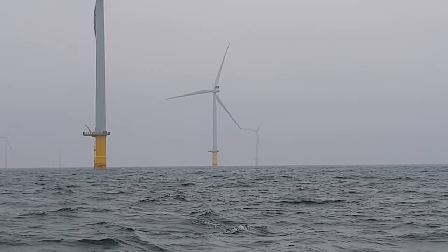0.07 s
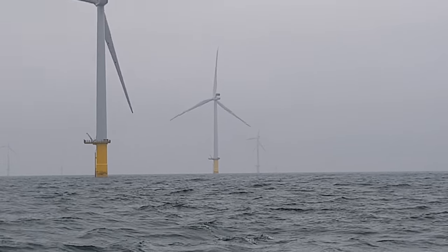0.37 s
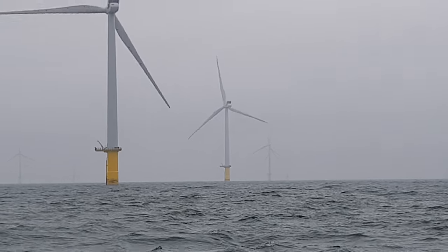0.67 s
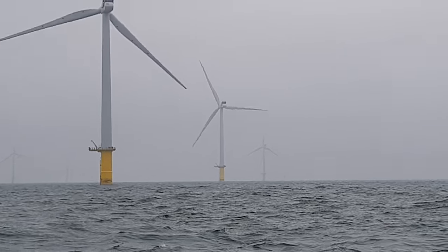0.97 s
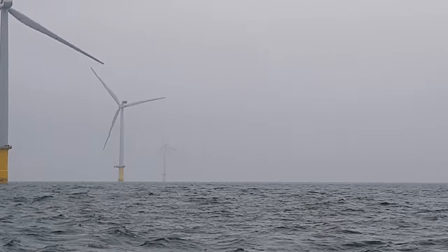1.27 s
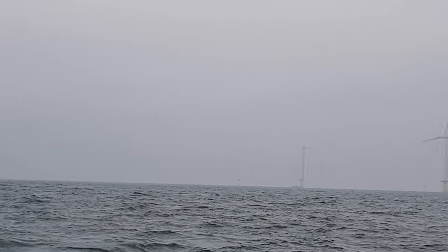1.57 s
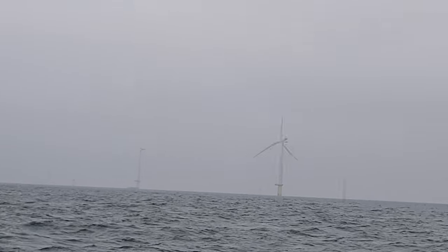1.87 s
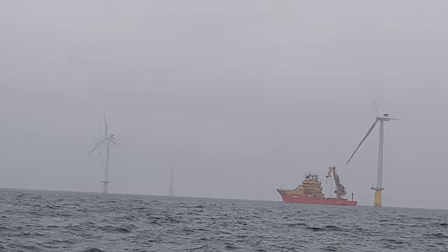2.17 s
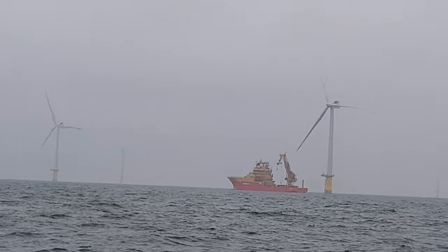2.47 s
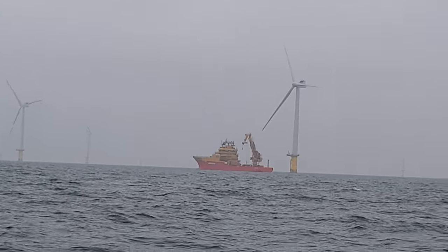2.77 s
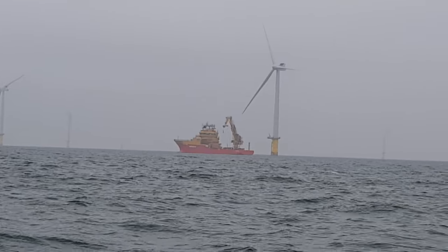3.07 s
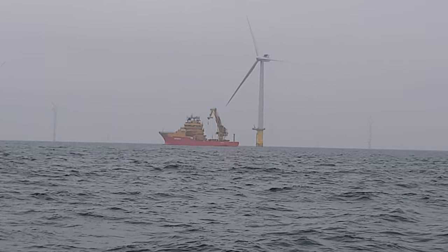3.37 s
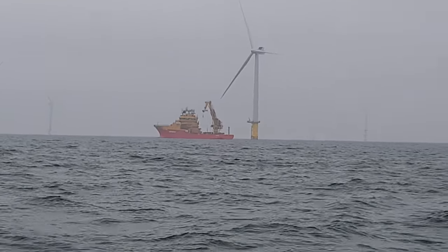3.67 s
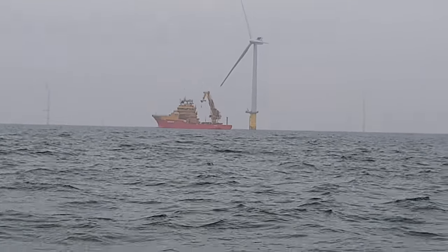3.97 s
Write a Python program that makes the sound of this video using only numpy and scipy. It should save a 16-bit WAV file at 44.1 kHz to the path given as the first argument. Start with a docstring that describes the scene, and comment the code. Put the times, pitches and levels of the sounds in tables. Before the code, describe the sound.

A diesel boat engine rumbles and throbs steadily, with a hard knock coming forward halfway through. Heard from on board at sea, choppy waves bubble along the hull under hissing wind and spray, and a few drops tick nearby.

```python
"""On board a boat in a choppy sea, a three-cylinder diesel runs steadily.
Its exhaust booms and burbles, each firing drums the hull, and loose panels hum in step.
A hard knock from the uneven cylinders comes forward halfway through.
Waves wash along the side as ringing bubbles and fizzing froth, under a hiss of wind and spray,
and a few drops tick close by."""
import sys
import numpy as np
from scipy import signal
from scipy.fft import rfft, irfft
from scipy.io import wavfile
from scipy.ndimage import uniform_filter1d, minimum_filter1d

SR = 44100
rng = np.random.default_rng(int(sys.argv[2]) if len(sys.argv) > 2 else 0)


def bounce(signal):
    """Save signal as a 16-bit WAV file at the path given by the first command-line argument."""
    frames = np.transpose(np.atleast_2d(signal))
    limited = np.clip(frames, -1, 1)
    pcm = np.round(limited * 32767).astype(np.int16)
    wavfile.write(sys.argv[1], SR, pcm)


N = 176400

# relative strength of each cylinder, in firing order: hull drum/dB, knock/dB
CYLINDERS = [(0, 0), (-1.5, -12), (-2.5, -3.5)]
# fader ride shared by the burble, the hull drum and the panels: t/s, level/dB
ENGINE_RIDE = [(0.0, -15), (1.05, -16), (1.12, -24.5), (1.24, -12.5), (1.51, -15), (1.69, -18.5),
               (1.84, -15), (2.12, -19.5), (2.72, -17.5), (2.77, -21), (2.82, -17), (3.21, -18.5),
               (3.27, -20), (3.32, -22.5), (3.49, -15.5), (3.91, -21), (3.94, -18.5), (4.0, -20)]


def undb(db):
    """Decibels to gain."""
    return 10 ** (np.asarray(db) / 20)


def unit(x):
    """Scale to rms 1."""
    return x / np.sqrt(np.mean(x ** 2) + 1e-18)


def curve(rows):
    """Straight lines through (t/s, value) rows."""
    return np.interp(np.arange(N) / SR, *np.array(rows).T)


def pan(db):
    """Stereo gains that put the left db above the right."""
    return undb(np.array([[db], [-db]]) / 2)


def walk(rate_hz):
    """Smooth random drift at rms 1."""
    hold = int(SR / rate_hz)
    steps = np.repeat(rng.standard_normal(N // hold + 2), hold)
    return unit(uniform_filter1d(uniform_filter1d(steps, hold), hold)[:N])


def colour(x, points):
    """EQ through (f/Hz, level/dB) points, rolled off beyond both ends, at rms 1."""
    hz, db = np.array(points).T
    f = np.arange(N // 2 + 1) * SR / N + 1
    skirt = 1 / (1 + (f / (2 * hz[-1])) ** 4) / (1 + (hz[0] / 2 / f) ** 4)
    return unit(irfft(rfft(x) * skirt * undb(np.interp(np.log(f), np.log(hz), db)), N))


def band(x, hz, half_width_hz):
    """A broad resonance with steep sides, at rms 1."""
    f = np.arange(N // 2 + 1) * SR / N + 1
    return unit(irfft(rfft(x) / (1 + 1j * (f * f - hz * hz) / (2 * f * half_width_hz)) ** 2, N))


def ring(x, modes, attack_s=1e-4):
    """Drive modes (f/Hz, t60/s, level/dB) that build up and decay."""
    t = np.arange(SR // 4) / SR
    response = sum(undb(db - 60 * t / t60) * np.sin(2 * np.pi * hz * t) for hz, t60, db in modes)
    return signal.fftconvolve(x, response * (1 - np.exp(-t / attack_s)))[:N]


def pulses(times, sizes):
    """One impulse at each time."""
    inside = (times >= 0) & (times < (N - 1) / SR)
    return np.bincount((times[inside] * SR).astype(int), sizes[inside], N)


def hits(times, strength_db, jitter_s, scatter_db):
    """Impulses loosened in timing and level, never twice quite alike."""
    late, size = rng.standard_normal((len(times), 2)).T
    return pulses(times + jitter_s * late, undb(strength_db + scatter_db * size))


def grains(per_s, spread_db):
    """Random tiny clicks, a few of them much larger."""
    clicks = (rng.random(N) < per_s / SR) * rng.choice([-1, 1], N)
    return unit(clicks * undb(spread_db * np.minimum(rng.exponential(size=N), 4)))


def wide(make, side_db):
    """Stereo from two independent draws of a texture, as mid and side."""
    mid, side = make(), undb(side_db) * make()
    return unit(mid + side * np.array([[1], [-1]])) * np.sqrt(1 + undb(side_db) ** 2)


def engine_grit(phase, repeat_share=.25):
    """Noise that partly repeats with every full engine cycle; phase counts firings."""
    loop = rng.standard_normal(4096)[(phase / len(CYLINDERS) % 1 * 4096).astype(int)]
    return np.sqrt(repeat_share) * loop + np.sqrt(1 - repeat_share) * rng.standard_normal(N)


def exhaust(phase):
    """A clean boom and throb locked to the firings, with gas burbling on each one."""
    # fader ride of the boom: t/s, level/dB
    boom_ride = [(0.04, -7), (0.38, -11), (1.07, -7.5), (1.13, -14.5), (1.49, -11), (1.53, -5.5),
                 (1.7, -16.5), (1.75, -9.5), (1.92, -15.5), (1.97, -11.5), (2.62, -9), (3.25, -9.5),
                 (3.3, -13.5), (3.44, -10), (3.51, -16), (3.79, -7), (3.93, -13), (3.97, -10)]
    # fader ride of the low throb: t/s, level/dB
    throb_ride = [(0.06, -31), (0.42, -41), (0.47, -33.5), (1.03, -31.5), (1.14, -50), (1.21, -33.5),
                  (1.5, -35.5), (1.7, -37), (1.76, -33), (3.2, -33.5), (3.33, -35.5), (3.75, -33),
                  (3.92, -38), (3.95, -30)]
    # partials of the throb: multiple of the firing rate, level/dB
    throb_partials = [(2, 5), (3, 1.5), (5, 6)]
    # EQ of the burbling gas: f/Hz, level/dB
    burble_eq = [(20, -24), (42, -26), (70, -3.5), (110, 1.5), (170, -1.5), (280, -3.5), (380, -13.5),
                 (600, -24), (1200, -41)]
    boom_trim_db, throb_trim_db, burble_trim_db = -.5, 5, -3.5
    # the uneven cylinders shift weight between boom and burble once per cycle
    lope = np.cos(2 * np.pi * (phase - 1.5) / len(CYLINDERS))
    boom = unit(np.cos(2 * np.pi * 4 * phase) * (1 + .1 * lope))
    throb = np.sqrt(2) * sum(undb(db) * np.cos(2 * np.pi * k * phase) for k, db in throb_partials)
    puffs = 1 + .19 * np.cos(2 * np.pi * phase)
    burble = colour(engine_grit(phase), burble_eq) * (1 - .12 * lope) * puffs
    return (boom * undb(curve(boom_ride) + boom_trim_db)
            + throb * undb(curve(throb_ride) + throb_trim_db + .26 * walk(11))
            + burble * undb(curve(ENGINE_RIDE) + burble_trim_db))


def panels(phase):
    """Loose panels hum in step with the engine, each wavering a little in level."""
    # panel tones: multiple of the engine's cycle rate, level/dB
    tones = [(18, -11.5), (24, -13), (29, -14), (35, -15), (54, -21.5)]
    cycle_angle = 2 * np.pi * phase / len(CYLINDERS)
    hum = sum(undb(db + 1.5 * walk(5.14)) * -np.sin(k * cycle_angle) for k, db in tones)
    return hum * undb(curve(ENGINE_RIDE))


def hull(times, strength_db, lead_s=.0086, trim_db=-4.5):
    """Every firing thumps the hull, which rings like a soft, low drum."""
    # hull modes: f/Hz, t60/s, level/dB
    modes = [(167.5, 0.047, 1), (188.5, 0.1, 13), (207.2, 0.08, -3), (260, 0.17, -15), (309.6, 0.22, -12.5),
             (450, 0.3, -18)]
    thumps = hits(times - lead_s, strength_db, jitter_s=.00014, scatter_db=4.1)
    return unit(ring(thumps, modes, attack_s=.008)) * undb(curve(ENGINE_RIDE) + trim_db)


def knock(times, strength_db, phase):
    """One cylinder knocks hard, a second more softly; clatter trails each blow, chatter fills gaps."""
    # fader ride of the knock: t/s, level/dB
    ride = [(0, -32), (.45, -39), (.8, -29.5), (1.1, -42), (1.33, -25), (1.6, -37), (1.92, -36.5),
            (2.02, -23), (3.05, -20), (3.35, -25.5), (3.65, -20), (3.85, -23), (4, -30)]
    # modes struck by the knock: f/Hz, t60/s, level/dB
    modes = [(608, .022, 0.5), (676, 0.025, 6.5), (751, 0.029, -1.5)]
    lag_s, clatter_decay_s, clatter_db, trim_db = .007457, .011, -1.5, -1.5
    blows = hits(times + lag_s, strength_db, jitter_s=.00029, scatter_db=1.5)
    tails = signal.lfilter([1], [1, -np.exp(-1 / (clatter_decay_s * SR))], blows)
    clatter = unit(tails * rng.standard_normal(N))
    drive = unit(blows) + undb(clatter_db) * clatter + engine_grit(phase)
    ringing = ring(drive, modes, attack_s=.0015)
    return band(ringing, hz=570, half_width_hz=380) * undb(curve(ride) + trim_db)


def bubbles(start, length, from_hz, to_hz, spread):
    """A cloud of short, rising rings whose pitch drifts as the wave runs by."""
    per_s, decay_cycles, rise_per_decay = 800, 9.7, .0091
    scatter_db, pan_spread_db = 5, 3.5
    cloud, t = np.zeros((2, N)), np.arange(SR // 30) / SR
    for k, (when, pitch, size, side) in enumerate(rng.standard_normal((600, 4))):
        onset = int((start + (k + when) / per_s) * SR)
        if 0 <= onset < min(N - len(t), (start + length) * SR):
            progress = (onset / SR - start) / length
            hz = from_hz * (to_hz / from_hz) ** progress * np.exp(spread * pitch)
            age = hz * t / decay_cycles
            envelope = undb(scatter_db * size) * np.sqrt(age) * np.exp(-age)
            chirp = np.sin(2 * np.pi * hz * t * (1 + rise_per_decay * age / 2))
            cloud[:, onset:onset + len(t)] += envelope * chirp * pan(pan_spread_db * side)
    return unit(cloud) * np.sqrt(length * SR / N)


def washes(fade_s=.069, gurgle_db=2, foam_db=-8.5, fizz_db=-22.5):
    """Each wave swells into gurgling bubbles and foam, with finer fizz above."""
    # waves along the hull: start/s, length/s, level/dB, first f/Hz, last f/Hz, pitch spread/share
    waves = [(-.15, 0.26, -31, 1630, 1320, 0.32), (0.603, 0.318, -32, 1643, 2030, 0.15),
             (0.652, 0.42, -37, 906, 976, 0.148), (0.878, 0.2, -30.5, 1757, 1840, 0.089),
             (1.322, .36, -29, 1533, 1478, 0.216), (1.75, 0.44, -32, 1056, 923, 0.136),
             (1.971, 0.368, -34.5, 2070, 1520, 0.101), (2.252, 0.49, -38, 1516, 1385, 0.146),
             (3.628, 0.24, -35, 1750, 1780, 0.15)]
    t, water = np.arange(N) / SR, 0
    froth = wide(lambda: grains(per_s=4400, spread_db=5.5), side_db=-19)
    gurgle = unit(undb(gurgle_db * walk(80)))
    fizz = undb(fizz_db) * band(froth, hz=4000, half_width_hz=1050)
    for start, length, db, from_hz, to_hz, spread in waves:
        swell = np.clip(np.minimum(t - start, start + length - t) / fade_s, 0, 1)
        centre_hz = (from_hz + to_hz) / 2
        foam = undb(foam_db) * band(froth, centre_hz, 2 * spread * centre_hz)
        bubbling = gurgle * bubbles(start, length, from_hz, to_hz, spread)
        water = water + undb(db) * swell * (bubbling + foam + fizz)
    return water


def chop(wander_db=.9, trim_db=-32):
    """Restless water all around: a bed of dense, tiny splashes."""
    # EQ of the open sea: f/Hz, level/dB
    eq = [(200, -7.5), (450, 3.5), (900, 1), (1300, -3.5), (1900, -1), (2600, -6), (3500, -7.5),
          (6000, -15)]

    def splashes():
        return colour(grains(per_s=3500, spread_db=2.5), eq) * undb(wander_db * walk(8.52))
    return wide(splashes, side_db=-7.5) * undb(trim_db)


def spray(droplets_db=-7, flutter_db=.5):
    """A wide hiss of wind and spray with fine droplets in it."""
    # EQ of the hiss: f/Hz, level/dB
    eq = [(1000, 10), (2200, -5), (3100, -8.5), (4100, 3.5), (5200, -4.5), (6600, -6.5), (7800, -4.5),
          (9500, -14.5), (12500, -4), (15500, -6)]
    # fader ride of the hiss: t/s, level/dB
    ride = [(0, -36.5), (.4, -40.5), (.5, -44), (1.05, -43), (1.5, -30), (1.75, -39), (2.1, -34.5),
            (2.45, -38), (2.6, -32.5), (3.45, -33.5), (3.8, -32.5), (4, -33)]
    # stereo lean on top of the water's pan: f/Hz, left minus right/dB
    lean = [(2000, 7), (4400, 3), (8100, -3), (12000, 0.5), (15000, 4)]

    def mist():
        air = rng.standard_normal(N)
        droplets = undb(droplets_db) * grains(per_s=1500, spread_db=6.5)
        return colour(air + droplets, eq) * undb(flutter_db * walk(40))
    hiss = wide(mist, side_db=-6)
    lean_db = np.interp(np.arange(N // 2 + 1) * SR / N, *np.array(lean).T)
    return irfft(rfft(hiss) * undb(np.array([lean_db, -lean_db]) / 2), N) * undb(curve(ride))


def drops():
    """A few close drops tick, each one a single short ring."""
    # drops landing: t/s, f/Hz, t60/s, level/dB
    ticks = [(1.298, 4800, .015, -28), (2.123, 2630, 0.027, -25), (2.16, 2920, 0.063, -28),
             (2.53, 4370, .015, -25), (3.894, 3550, 0.023, -21.5)]
    return sum(ring(pulses(np.array([at]), np.ones(1)), [mode]) for at, *mode in ticks)


def scene():
    """The engine near the centre, the water wide and a little to the left."""
    # engine speed: t/s, firing rate/Hz
    speed = [(0, 26.4), (1.25, 26.46), (2.1, 26.68), (4, 26.73)]
    phase = .085 + np.cumsum(curve(speed)) / SR  # counts firings
    firings = np.arange(1, int(phase[-1]) + 1)
    times = np.interp(firings, phase, np.arange(N) / SR)
    drum_db, knock_db = np.array(CYLINDERS)[firings % len(CYLINDERS)].T
    engine = exhaust(phase) + panels(phase) + hull(times, drum_db)
    knocking = knock(times, knock_db, phase)
    water = washes() + chop() + spray() + drops()
    return engine * pan(db=.72) + knocking * pan(db=1.4) + water * pan(db=1.5)


def record(dry):
    """Cut the deepest bass, limit the peaks and take off the very top."""
    low_cut_hz, top_hz, ceiling, limiter_s = 38, 15900, .95, .004
    f = np.arange(N // 2 + 1) * SR / N + 1
    mix = irfft(rfft(dry) / (1 + (low_cut_hz / f) ** 8), N)
    window = int(limiter_s * SR)
    safe_gain = ceiling / np.maximum(np.abs(mix).max(axis=0), ceiling)
    gain = uniform_filter1d(minimum_filter1d(safe_gain, window), window)
    return signal.sosfilt(signal.ellip(10, .1, 80, top_hz, fs=SR, output="sos"), mix * gain)


dry = scene()
out = record(dry)
bounce(out)
```